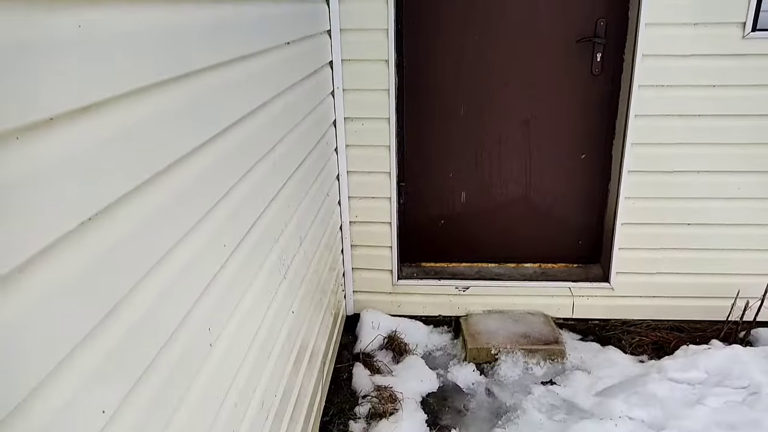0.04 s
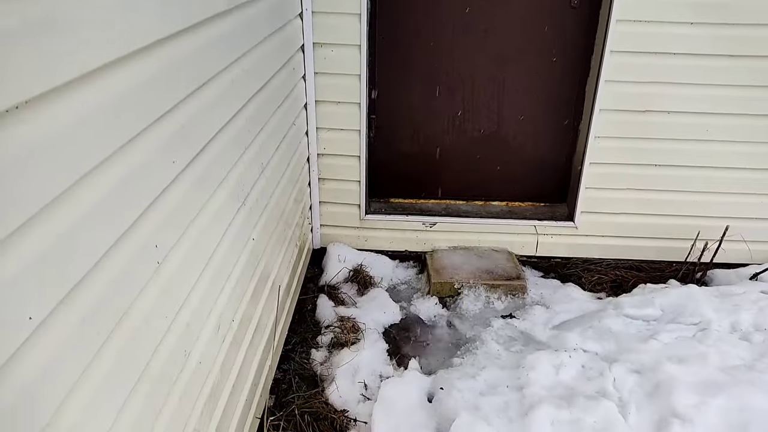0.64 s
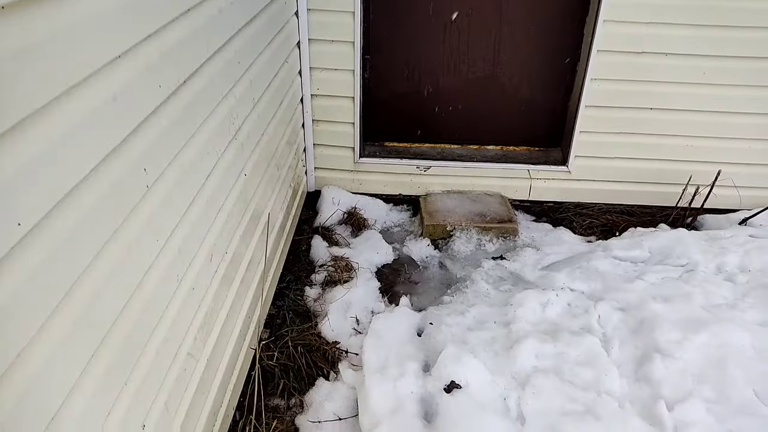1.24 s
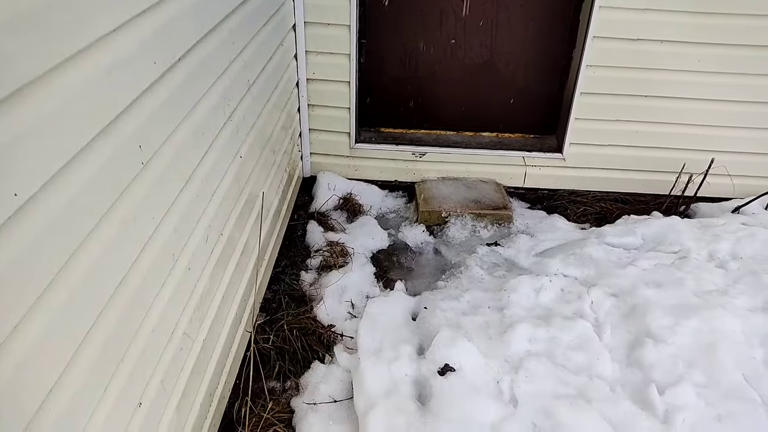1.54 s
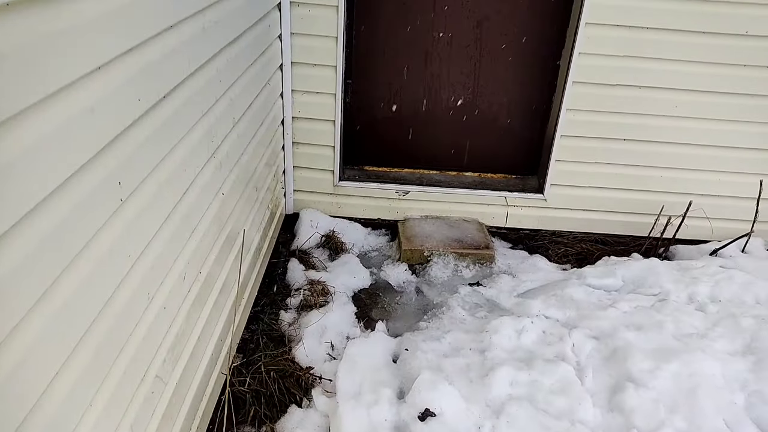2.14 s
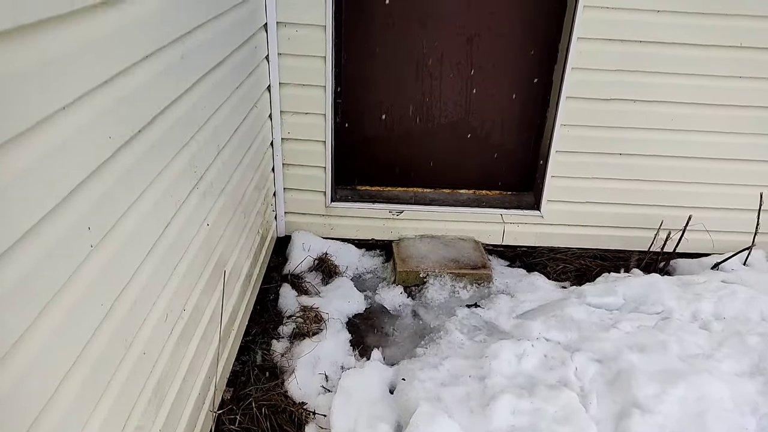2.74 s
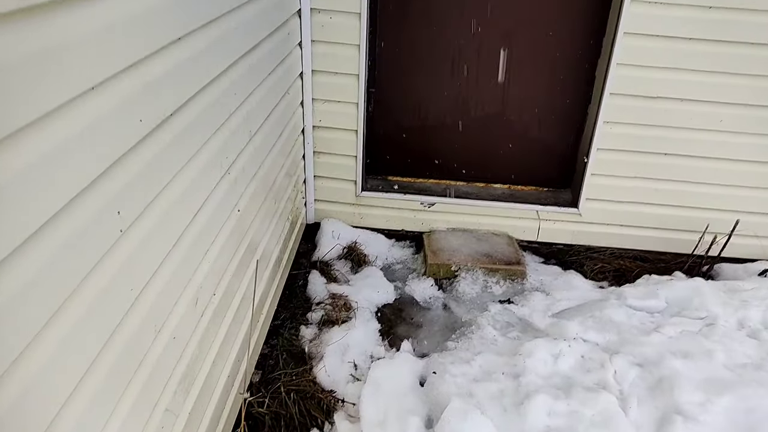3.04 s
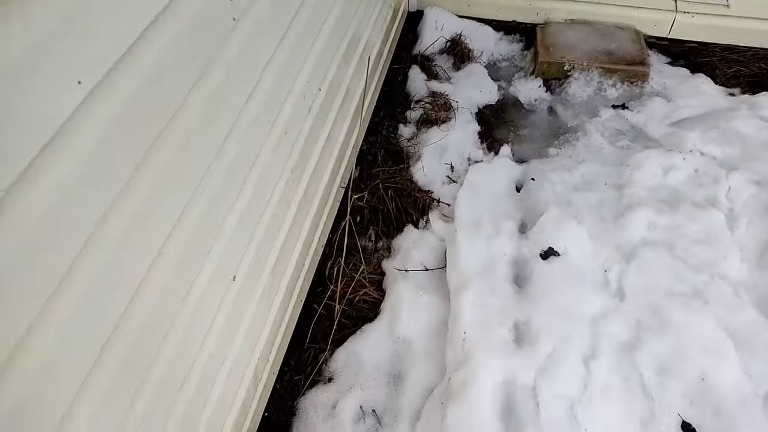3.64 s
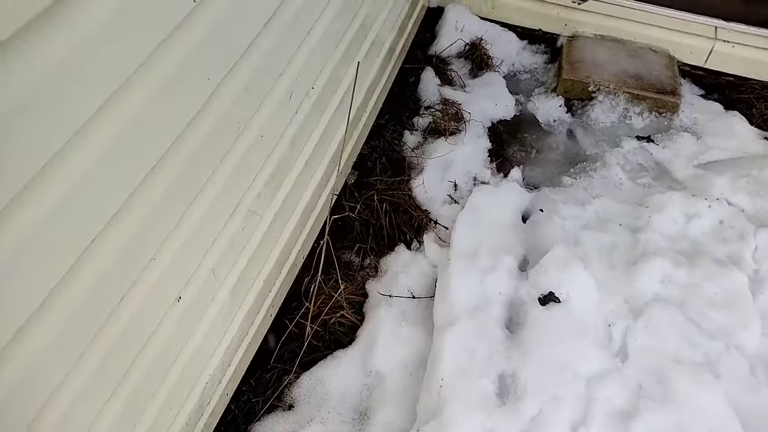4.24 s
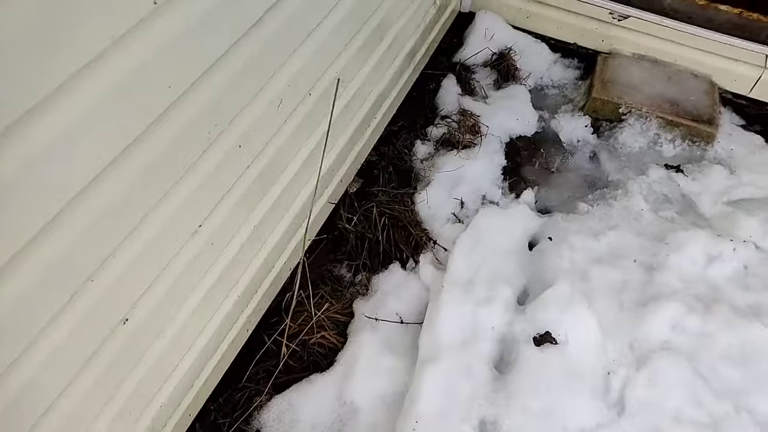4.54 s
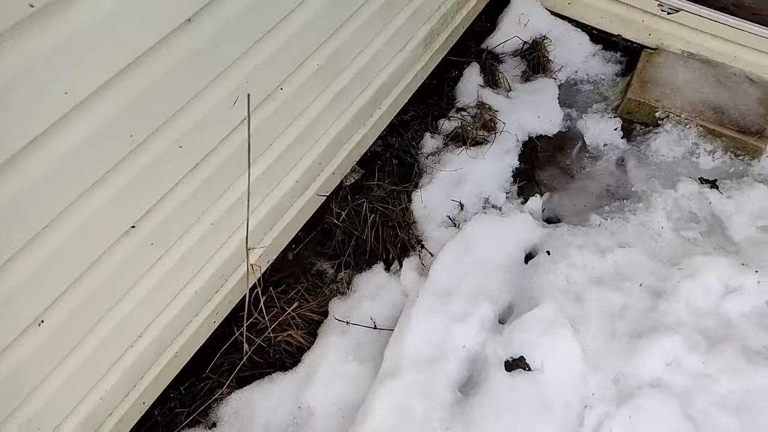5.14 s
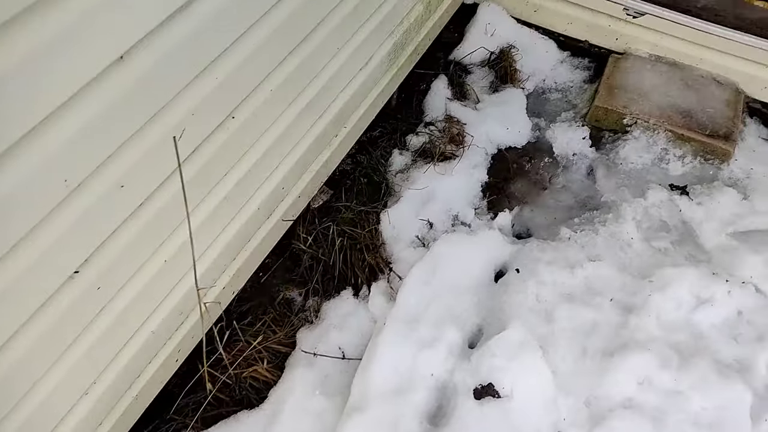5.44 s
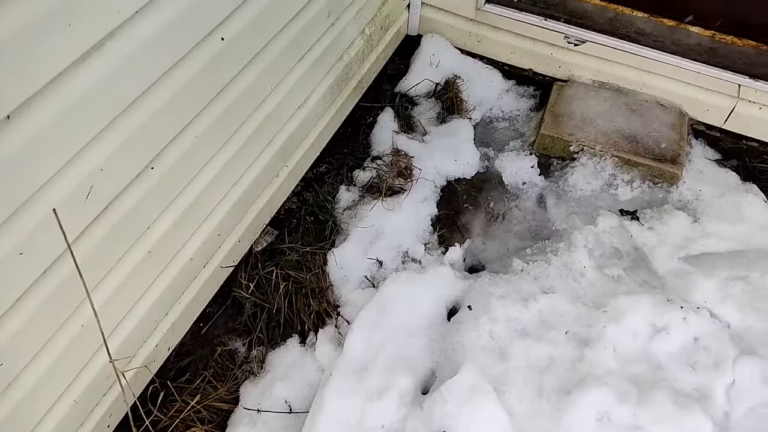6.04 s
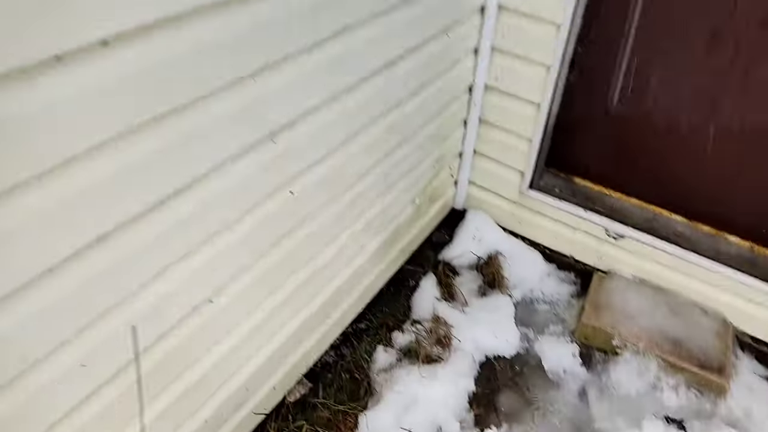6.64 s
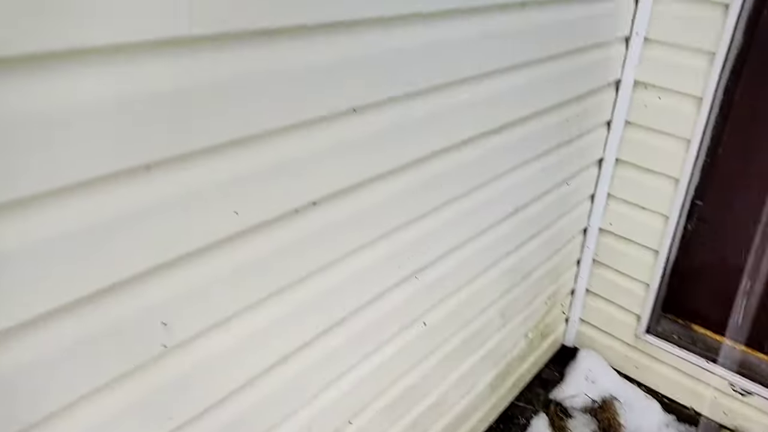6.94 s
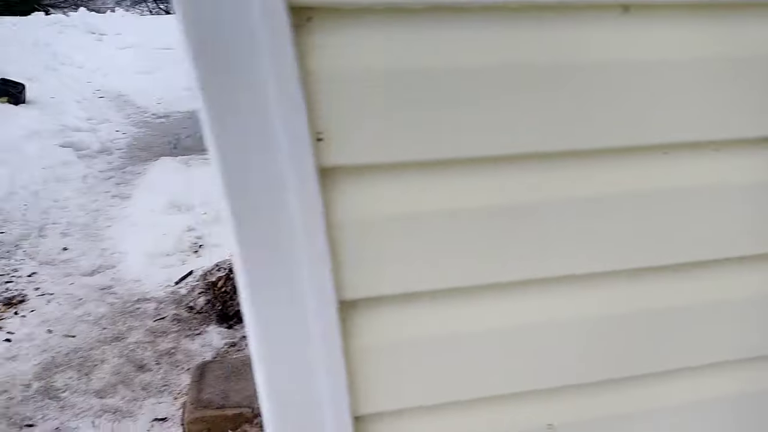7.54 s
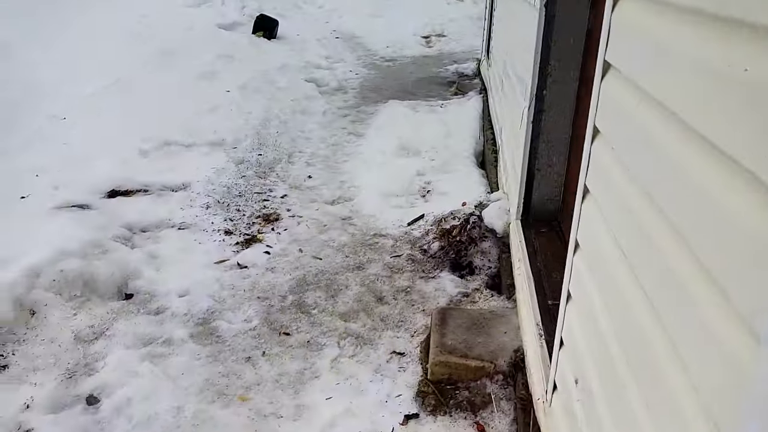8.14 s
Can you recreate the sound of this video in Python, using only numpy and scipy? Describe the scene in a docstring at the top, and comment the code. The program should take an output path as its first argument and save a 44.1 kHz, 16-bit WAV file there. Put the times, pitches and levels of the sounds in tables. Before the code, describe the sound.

Outdoors in the corner of a house, meltwater drips from the eaves close to the microphone, splatting on slush, ticking on ice and plinking in puddles in an irregular patter. Light wind rumbles on the microphone, mostly at the start. Midway, someone shifts through wet snow with soft crunches, and a few lighter steps follow near the end. The dripping never stops, over a faint fizz of seeping water.

```python
"""From the start, meltwater drips from the eaves in the corner of a house: each impact splats on slush,
ticks on ice or traps a ringing bubble in a puddle. Light wind buffets the microphone, most in the first
second. From 3 s to about 5.5 s someone shifts through wet snow, crushing its grains underfoot; a few
lighter steps follow near 7 s and 7.7 s, and the dripping lasts to the end. Throughout, slush seeps,
the two walls reflect the drips briefly, and each microphone port resonates at its own treble pitch."""
import sys
import numpy as np
from scipy import signal
from scipy.fft import rfft, irfft, next_fast_len
from scipy.io import wavfile
from scipy.ndimage import uniform_filter1d, map_coordinates

SR = 44100
rng = np.random.default_rng(int(sys.argv[2]) if len(sys.argv) > 2 else 0)


def put_to_file(sound):
    """Save the sound as 16-bit audio at rate SR, in the file named by the first command-line argument."""
    columns = np.atleast_2d(sound).T  # one column per channel
    safe = np.clip(columns, -1, 1)
    whole_steps = np.round(safe * 32767)
    wavfile.write(sys.argv[1], SR, whole_steps.astype(np.int16))


N = 369232

# Levels in all tables are relative; balance is left minus right.
# Loudest nearby drops: t/s, level/dB, slap/dB, balance/dB and, for heavy drops, thud/dB
NEAR_DROPS = [(.1311, -15, -22, 0), (.275, -15.5, -16, -7), (.393, -14, -21, -3), (.421, -22.5, -1.5, 1),
              (.6103, -6, -24, 1), (.762, -20, -4, 2, -14), (.806, -15, -30, 3.5, -16),
              (.856, -25, -2.5, 2), (.8849, -9, -10.5, 1, -23), (.927, -13, -11.5, 2), (.964, -20, 0, 1),
              (1.038, -9.5, -30, 2), (1.074, -17, -8, 0), (1.2062, -8, -10, .5, -22.5),
              (1.377, -12.5, -30, -3), (1.4, -13.5, -6, 2), (1.4198, -10, -32, 5), (1.448, -17, -8.5, -1),
              (1.492, -15.5, -23, 2.5, -14.5), (1.6106, -17.5, -20, 5), (1.699, -16, -9.5, 3),
              (1.7644, -19, -25, 1), (1.8055, -16.5, -13.5, 3), (2.0206, -3.5, -7, 2.5, -18.5),
              (2.117, -13.5, -25, -5), (2.141, -17, -14, 4), (2.1603, -13.5, -22, -5),
              (2.229, -14, -8, 1.5), (2.322, -10, -11.5, 5, -26), (2.489, -12, -8, -.5, -4),
              (2.5111, -13, -9, 0, -17), (2.7152, -12, -11, 0), (2.933, -14, -22, 6), (3.1474, -5, -15, 0),
              (3.3555, -14, -9, 5.5), (3.481, -11.5, -35, -4), (3.713, -18, -22, 6),
              (3.85, -10.5, -12, -3.5, -20), (3.9675, -15, -9, -1, -21), (4.0062, -3, -26, -6.5),
              (4.5263, -14, -24, -6, 0), (4.69, -14, -6.5, 3), (4.703, -12.5, -12.5, 5),
              (4.801, -10, -9, -3.5), (4.808, -3.5, -22, 6), (4.8787, -13, -9.5, 2), (4.935, -3, -25, 1),
              (5.0118, -14.5, -7, -1), (5.0495, -10, -14, -4), (5.1097, -13, -10, -2, -11.5),
              (5.1838, -7, -11, 0), (5.3765, -18, -10, 0, -3), (5.726, -16, -22, -1),
              (5.902, -8, -41, -2, -12.5), (6.1448, -13, -10, 4), (6.191, -22, -1, 2),
              (6.3941, -10.5, -16, -2), (6.6077, -10, -35, -7, -18), (6.64, -14, -15, 0, -15),
              (6.664, -15, -30, -3), (6.778, -11, -18, -1), (6.8251, -17.5, 2.5, -2),
              (6.8744, -6.5, -8.5, 3, -18), (6.923, -19, 0, 5), (7.017, -16.5, -32, -12),
              (7.2147, -14, -36, -7, -15), (7.348, -12.5, -29, -10, -20), (7.4136, -13.5, -24, -1, -19),
              (7.4335, -7.5, -7, .5, -23), (7.54, -9, -30, -4), (7.6209, -12.5, -26, -2.5, -8.5),
              (7.667, -8, -21, -3), (7.923, -10.5, -41, 2.5), (8.0294, -13, -20, -1), (8.08, -14, -17, -2),
              (8.153, -14.5, -30, -5), (8.2703, -15.5, -20, -8)]
# Droplets on hard ice: t/s, level/dB, balance/dB
ICE_TICKS = [(.571, -15, 2), (.695, -13, 1), (1.1064, -14, -2), (2.1824, -9, -3), (2.2, -13, -4),
             (2.4433, -12, 8), (2.8828, -14, 3), (2.9438, -12, -4), (3.5663, -10, 7), (4.9082, -12, -12),
             (5.0666, -8, -1), (5.674, -14, 1), (6.053, -13, 0), (6.1025, -15, 2), (6.4268, -13, -15),
             (7.2383, -11, -3), (7.491, -13.5, -11), (7.564, -12, -6.5), (7.6393, -6, -3),
             (7.9703, -15, -11)]
# Drops sinking into soft slush: t/s, level/dB, resonance of the hollow f/Hz
SLUSH_SPLASHES = [(.211, -35, 7000), (.316, -30, 4500), (.48, -33, 5500), (.53, -30, 4000),
                  (1.007, -32, 6000), (1.284, -36, 3000), (1.66, -30, 3600), (1.902, -27, 5600),
                  (1.945, -30, 6600), (2.55, -29, 3800), (2.603, -28, 6000), (2.648, -30, 3400),
                  (2.765, -32, 2700), (2.852, -31, 2500), (2.912, -29, 7000), (3.029, -32, 7000),
                  (3.649, -33, 2900), (3.886, -31, 3400), (4.838, -27, 6500), (5.568, -28, 2800),
                  (5.783, -29, 2500), (5.848, -31, 5000), (5.936, -24, 6100), (6.273, -26, 3600),
                  (6.31, -28, 6600), (6.503, -24, 4000), (7.074, -26, 2500), (8.179, -30, 5600),
                  (8.239, -32, 3000)]
# Bubbles trapped in puddles: t/s, level/dB, f/Hz
PUDDLE_BUBBLES = [(0.05, -28.5, 1360), (.764, -25, 5300), (.887, -23, 3900), (.965, -25, 4000),
                  (1.159, -37, 1680), (1.206, -28, 2160), (1.235, -31, 2210), (1.366, -27, 1330),
                  (1.395, -30, 1430), (1.452, -22, 3430), (1.635, -34.5, 1840), (1.639, -28, 3940),
                  (1.846, -30, 2200), (1.864, -13.5, 8850), (1.903, -35, 2020), (1.936, -32.5, 1590),
                  (2.022, -9, 3830), (2.308, -17.5, 7460), (2.86, -32, 2290), (2.972, -23, 1835),
                  (3.896, -35, 1630), (5.377, -21, 2010), (5.475, -26.5, 774), (5.499, -23.5, 880),
                  (5.784, -33, 1470), (5.835, -34, 573), (5.883, -33, 2090), (5.923, -26, 964),
                  (6.386, -26, 890), (6.442, -26, 2700), (6.573, -21, 1420), (6.773, -28, 1720),
                  (6.987, -31, 1780), (7.051, -30.5, 1720), (7.863, -16, 1760), (7.899, -27, 1890),
                  (8.107, -39, 1940)]
# Rising runs of bubbles: t/s, level/dB, first f/Hz, last f/Hz, duration/s
GURGLE_RUNS = [(0.512, -41, 670, 1610, 0.026), (1.578, -41, 814, 1600, 0.046),
               (5.172, -39, 440, 1110, 0.082), (5.903, -31, 890, 1500, 0.044)]
# Weight shifts onto a boot: t/s, rise/s, hold/s, T60/s, crunch/dB, crackle/dB, thud/dB
FOOTFALLS = [(3.067, 0.01, 0.03, .15, -34, -33.5, -24.5), (3.119, 0.023, 0.037, 0.19, -28, -27.5, -22),
             (3.274, 0.005, 0.006, 0.12, -23.5, -22.5, -17), (3.297, 0.0037, 0.0019, 0.1, -29, -21, -25),
             (3.408, 0.059, 0.0061, 0.072, -36, -36, -40), (3.785, .025, .02, .09, -41, -43, -41),
             (3.986, 0.0024, .002, 0.046, -31, -47, -28), (4.001, 0.0053, 0.005, 0.12, -28, -27, -26),
             (4.015, 0.0092, 0.073, 0.41, -35.5, -29, -50), (4.151, 0.066, 0.021, 0.37, -24, -22, -44),
             (4.261, 0.021, 0.052, 0.14, -26.5, -26, -30), (4.37, 0.07, 0.029, 0.14, -24, -23, -30.5),
             (4.501, 0.018, 0.058, 0.17, -34.5, -30.5, -34),
             (4.926, 0.013, 0.0049, 0.062, -38.5, -17.5, -43), (5.16, 0.04, 0.02, 0.1, -55, -30, -44),
             (5.221, 0.03, 0.054, 0.4, -35, -18, -47), (5.458, 0.018, 0.15, 0.46, -45, -34.5, -48),
             (6.81, 0.019, 0.013, 0.06, -37.5, -31, -37), (6.867, 0.0069, 0.027, 0.6, -37.5, -30.5, -47),
             (7.162, 0.0051, 0.0067, 0.094, -56, -48, -32.5),
             (7.714, 0.012, 0.014, 0.061, -31.5, -25.5, -28.5), (7.746, 0.02, 0.07, 0.18, -43, -33, -55)]
# Spectra of snow packing, coarse crunch and fine crackle: f/Hz, level/dB
PACKING_SPECTRUM = [(60, -29), (160, -4.5), (360, 1), (560, 2), (850, -6), (1300, -7.5), (1900, -2),
                    (2800, -19), (6000, -11)]
CRUNCH_SPECTRUM = [(100, 2), (250, -14.5), (450, -14), (750, -3.5), (1200, 1), (1550, 0), (1900, 3),
                   (2600, -6), (3500, -4), (4500, -26), (9000, -48)]
CRACKLE_SPECTRUM = [(800, -7.5), (2800, -1), (4000, -1), (5200, -1.5), (7000, 2.5), (10000, 1.5),
                    (14000, 0)]
# Left-right coherence underfoot and of the background: f/Hz, coherence/1
BOOT_COHERENCE = [(60, .2), (290, 1), (700, .65), (1400, 0.31), (3000, 0.086), (6500, 0.017)]
FIELD_COHERENCE = [(60, 0.13), (250, 0.67), (500, 0.3), (1000, 0.05), (2000, 0.07), (4000, 0.028),
                   (10000, 0.017)]
# Breeze between gusts: t/s, level/dB
BREEZE_LEVELS = [(0, -27.5), (1.9, -39), (2.8, -50), (4.0, -43.5), (4.8, -48), (5.6, -51.5), (6.4, -64),
                 (7.4, -45), (8.37, -41.5)]
# Gusts on the microphone: t/s, duration/s, level/dB
WIND_GUSTS = [(0, 0.25, -25), (0.325, 0.064, -23), (0.475, 0.071, -22.5), (0.7, 0.17, -28.5),
              (1.432, 0.048, -32), (2.371, 0.11, -32.5), (3.369, 0.36, -34.5), (4.116, 0.21, -29),
              (4.358, 0.17, -30), (5.005, 0.17, -36), (5.49, 0.064, -37), (6.61, 0.21, -42.5),
              (6.823, 0.077, -27), (6.925, 0.38, -32.5), (8.112, 0.14, -30.5)]
# Sudden eddies at the ports: t/s, level/dB, half-width/s
EDDY_THUMPS = [(.009, -23, .005), (.074, -26, .005), (.12, -26, .009), (.175, -20, .005), (.202, -18, .006),
               (.24, -23, .008), (.36, -25, .014), (.538, -16, .0075), (6.898, -29, .01)]
# Spectra of the wind's deep rumble and higher flutter: f/Hz, level/dB
RUMBLE_SPECTRUM = [(10, 2), (25, 3.5), (65, 0.5), (110, -6), (180, -21), (300, -34), (800, -44),
                   (3000, -100)]
FLUTTER_SPECTRUM = [(40, -18), (110, 7.5), (210, 1), (300, -11), (450, -21.5), (1000, -59), (3000, -84)]
# Background of melting: t/s, spray level/dB, slush level/dB
SEEP_LEVELS = [(0, -39, -54), (.72, -33.5, -47.5), (2.9, -32.5, -42.5), (4.36, -29.5, -39.5),
               (4.7, -34.5, -47), (5.5, -30.5, -38.5), (6.04, -31.5, -46), (6.76, -27, -39),
               (7.0, -28.5, -39), (7.15, -28.5, -39.5), (7.55, -39.5, -43.5), (8.37, -35, -42)]
# Spectra of distant spray and seeping slush: f/Hz, level/dB
SPRAY_SPECTRUM = [(500, -12), (1500, 8), (2900, 6.5), (4000, 11.5), (5000, 11.5), (8000, 11), (14000, 14)]
SLUSH_SPECTRUM = [(30, 23), (100, 4.5), (250, 1.5), (500, 2), (1000, -5), (1900, -2.5), (3000, -4),
                  (8000, -62)]
# Decay of the wall reflections: f/Hz, T60/s
WALL_DECAY = [(200, 0.019), (2000, 0.13), (10000, 0.047)]
# Resonances of the left and right port: f/Hz, bandwidth/Hz, gain/dB
PORT_RESONANCES = [(8640, 937, 17), (11350, 2070, 14.5)]


def drops(tick_db=-13, slap_db=-7.5, smack_db=-16, thud_db=-6, ring_db=-7.5, spray_db=-19.5):
    """Impact excitation: a drop cracks, bursts and sprays, sounding a hollow in slush and tiny bubbles."""
    crack_t60, burst_t60, spray_t60 = .00028, .026, .28  # s
    out, t = np.zeros((2, N)), np.arange(SR // 7) / SR
    for s, db, slap, pan_db, *heavy in NEAR_DROPS:
        thud = heavy[0] if heavy else -31
        noise = rng.standard_normal((6, len(t)))
        bright, dull, common = noise[:2], noise[2:4], noise[4]
        crack = amp(6 - 60 * t / crack_t60)
        burst = amp(-60 * t / (burst_t60 * rng.lognormal(0, .2))) * (1 - np.exp(-t / .0003))
        droplets = amp(3.5 * unit(uniform_filter1d(noise[5], size=45)))  # the drop breaks up unevenly
        impact = crack + burst * unit(droplets)
        splash = impact + amp(spray_db - 60 * t / spray_t60) * droplets
        tick = amp(tick_db) * band(splash * (bright + .047 * common), 6160, 12540)
        hollow_hz = 4290 * rng.lognormal(0, .11)
        hollow = band(splash * (.8 * dull + .5 * common), .82 * hollow_hz, 1.22 * hollow_hz)
        smack = band(splash * (bright + common), 2200, 6500)
        wet = amp(slap_db + slap) * hollow + amp(smack_db + slap) * smack
        low = amp(thud_db + thud) * band(impact * common, 180, 2460)
        gain = amp(db) * balance(pan_db)
        add(out, s, gain * (tick + wet + low))
        delays = rng.exponential(.003, size=3)
        bubble_hz = np.array([4000, 5600, 9000]) * rng.lognormal(0, .12, size=3)
        for delay, hz in zip(delays, bubble_hz):
            share_db = np.interp(hz, [5000, 9000], [slap, -10])  # larger bubbles come with a wetter slap
            add(out, s + delay, gain * amp(ring_db + share_db) * ping(hz, cycles=70, glide=.04))
    return out


def ticks(level_db=-7.5, crack_t60=.012, tail_db=-15, tail_t60=.08):
    """Impact on a rigid surface: a droplet on ice gives one bright crack and a trace of spray."""
    out, t = np.zeros((2, N)), np.arange(SR // 15) / SR
    envelope = amp(-60 * t / crack_t60) + amp(tail_db - 60 * t / tail_t60)
    for s, db, pan_db in ICE_TICKS:
        tick = band(rng.standard_normal((2, len(t))) * envelope, 6000, 14000)
        tick /= np.abs(tick).max(axis=1, keepdims=True)
        add(out, s, amp(db + level_db) * balance(pan_db) * tick)
    return out


def splashes(level_db=-6.5, hollow_db=-8, rise_s=.0015, t60=.085, uneven_db=3.5):
    """Cavity resonance: a drop sinks into slush, scatters spray and leaves a ringing hollow."""
    out, t = np.zeros((2, N)), np.arange(SR // 7) / SR
    for s, db, hz in SLUSH_SPLASHES:
        noise = rng.standard_normal((3, len(t)))
        flicker_db = uneven_db * unit(uniform_filter1d(noise[2], size=90))
        spray = noise[:2] * (1 - np.exp(-t / rise_s)) * amp(flicker_db - 60 * t / t60)
        hollow = amp(hollow_db) * band(spray, .85 * hz, 1.18 * hz)
        add(out, s, amp(db + level_db) * (band(spray, 6500, 14000) + hollow))
        add(out, s + rise_s, amp(db + level_db) * ping(hz, cycles=130, glide=.06))
    return out


def bubbles(ring_db=2, splash_db=-8, splash_t60=.045, ring_t60_at_1khz=.031):
    """Bubble resonance: air trapped by a splash in a puddle rings, the low bubbles a little longer."""
    out, t = np.zeros((2, N)), np.arange(SR // 25) / SR
    for s, db, hz in PUDDLE_BUBBLES:
        splash = band(rng.standard_normal(len(t)) * amp(-60 * t / splash_t60), .65 * hz, 2 * hz)
        ring = ping(hz, cycles=ring_t60_at_1khz * np.sqrt(1000 * hz), glide=.07)
        add(out, s, amp(db) * (amp(ring_db) * ring + amp(splash_db) * splash))
    return out


def gurgles(count=8):
    """Pitch varies inversely with radius: water filling a hollow sheds ever smaller bubbles."""
    out = np.zeros((2, N))
    for s, db, start_hz, end_hz, length in GURGLE_RUNS:
        for progress in np.linspace(0, 1, count):
            onset = s + progress * length + rng.normal(0, .002)
            hz = start_hz * (end_hz / start_hz) ** progress
            add(out, onset, amp(db) * ping(hz, cycles=22, glide=.1))
    return out


def steps(squelch_db=-6):
    """Granular fracture: wet ice crunches and crackles under a boot, and the snow thuds as it packs."""
    power = np.zeros((3, N))
    for start, rise, hold, t60, *levels_db in FOOTFALLS:
        power += (amp(levels_db)[:, None] * swell(start, rise, hold, t60)) ** 2
    crunch, crackle, thud = np.sqrt(power)

    def snow(spectrum, depth_db, **texture):
        return hollows(stereo(grains(**texture), spectrum, BOOT_COHERENCE), depth_db)

    packing = snow(PACKING_SPECTRUM, depth_db=2.5, per_s=400, spread_db=4, t60=.014, hiss=.5)
    coarse = snow(CRUNCH_SPECTRUM, depth_db=3.5, per_s=380, spread_db=3, t60=.008, hiss=.35)
    fine = snow(CRACKLE_SPECTRUM, depth_db=2.5, per_s=2400, spread_db=4, t60=.004, hiss=.7)
    return thud * packing + crunch * (coarse + amp(squelch_db) * squelch()) + crackle * fine


def squelch(middle_hz=1550, count=900, spread_db=4):
    """Compression drives air out of soaked snow as short rising bubble tones; rms 1."""
    out = np.zeros((2, N))
    onsets = rng.uniform(0, N / SR, count)
    for s, (loud, pitch) in zip(onsets, rng.standard_normal((count, 2)).clip(-2, 1.6)):
        add(out, s, amp(spread_db * loud) * ping(middle_hz * np.exp(.45 * pitch), cycles=34, glide=.12))
    return unit(out)


def wind(flutter_db=-9, steepness=2.07, reference_db=-25, lumps_db=4.5, rise_s=.023, t60=.27):
    """Turbulent pressure: eddies hit each port separately, and stronger gusts reach higher in pitch."""
    breeze_db, = curves(BREEZE_LEVELS)
    gust_power = sum((amp(db) * swell(s, rise_s, length - rise_s, t60)) ** 2
                     for s, length, db in WIND_GUSTS)
    buffet_db = 10 * np.log10(amp(breeze_db) ** 2 + gust_power)
    lumps = amp(lumps_db * np.array([wobble(28), wobble(28)]))

    def eddies(spectrum):
        return unit(lumps * filtered(rng.standard_normal((2, N)), lambda hz: amp(along(spectrum, hz))))

    t = np.arange(N) / SR
    thumps = sum(amp(db) * np.exp(-np.minimum(((t - s) / width) ** 2, 20)) for s, db, width in EDDY_THUMPS)
    rumble = amp(buffet_db) * eddies(RUMBLE_SPECTRUM)
    flutter_gain = amp(reference_db + flutter_db + steepness * (buffet_db - reference_db))
    flutter = (thumps + flutter_gain) * eddies(FLUTTER_SPECTRUM)
    return (rumble + flutter) * amp([[3.5], [.5]])  # stronger on the left


def trickle(level_db=-40.5, middle_hz=2200, spread_db=3, count=100):
    """Random bubble resonances: seeping water rings faintly in wet snow, the higher bubbles louder."""
    out = np.zeros((2, N))
    onsets = rng.uniform(0, N / SR, count)
    for s, (loud, pitch) in zip(onsets, rng.standard_normal((count, 2)).clip(-2, 1.5)):
        ring = ping(middle_hz * np.exp(.35 * pitch), cycles=36, glide=.11)
        add(out, s, amp(level_db + spread_db * loud + 2 * pitch) * ring)
    return out


def seep(fizz_db=-10):
    """Incoherent summation: tiny events merge into a fizz of distant spray and a seep of melting slush."""
    spray_db, slush_db = curves(SEEP_LEVELS)
    spray = stereo(grains(per_s=120, spread_db=5, t60=.02, hiss=.7), SPRAY_SPECTRUM)
    fizz = hollows(spray, depth_db=2.5)
    slush = stereo(grains(per_s=54, spread_db=7.5, t60=.15, hiss=.51), SLUSH_SPECTRUM)
    return amp(spray_db + fizz_db) * fizz + amp(slush_db) * slush


def walls(x, delay_s=.0028):
    """Diffuse reflection: the siding scatters a short, delayed tail back to each port."""
    hz, t, spectra = signal.stft(rng.standard_normal((2, SR // 4)), SR, nperseg=256)
    tail = signal.istft(spectra * amp(-60 * t / along(WALL_DECAY, hz)[:, None]), SR, nperseg=256)[1]
    tail = np.pad(tail / np.linalg.norm(tail[0]), ((0, 0), (round(delay_s * SR), 0)))
    return signal.fftconvolve(x, tail, axes=1)[:, :N]


def ping(hz, cycles, glide):
    """Damped oscillation: a bubble falls 60 dB in `cycles` periods, its pitch rising by the part `glide`."""
    turns = hz * np.arange(SR // 25) / SR
    age = turns / cycles
    phase = 2 * np.pi * turns * (1 + glide * np.minimum(age, 1))
    port_phase = rng.normal(0, min(hz / 2500, 3), (2, 1))
    return np.sin(phase + port_phase) * amp(-60 * age) * (1 - np.exp(-turns * 2))


def grains(per_s, spread_db, t60, hiss):
    """Shot noise: two channels of tiny bursts of random time and size, on a bed of hiss."""
    sizes = (rng.random(N) < per_s / SR) * amp(spread_db * np.minimum(rng.standard_normal(N), 2))
    decay = amp(-60 * np.arange(SR // 10) / SR / t60)
    power = signal.fftconvolve(sizes ** 2, decay ** 2)[:N].clip(0)
    return np.sqrt(power / power.mean() + hiss ** 2) * rng.standard_normal((2, N))


def hollows(x, depth_db):
    """Transient resonance: pockets in the snow colour the sound as they open and collapse."""
    spectra = signal.stft(x, nperseg=512)[2]
    field = uniform_filter1d(rng.standard_normal(spectra.shape[1:]), size=3, axis=0)  # over frequency
    field = uniform_filter1d(field, size=6, axis=1)  # over time
    return unit(signal.istft(spectra * amp(depth_db * unit(field)), nperseg=512)[1][:, :N])


def stereo(pair, spectrum, coherence=FIELD_COHERENCE):
    """Partial coherence: two unrelated signals are coloured and blended as mid and side; rms 1."""
    def response(hz):
        angle = np.arccos(np.clip(along(coherence, hz), -1, 1)) / 2
        return amp(along(spectrum, hz)) * np.array([np.cos(angle), np.sin(angle)])

    mid, side = filtered(pair, response)
    return unit(np.array([mid + side, mid - side]))


def swell(start, rise, hold, t60):
    """Envelope: a linear rise to 1, a hold and an exponential decay."""
    age = np.arange(N) / SR - start
    return np.clip(age / rise, 0, 1) * amp(-60 * np.clip((age - rise - hold) / t60, 0, 2))


def wobble(per_s):
    """Spline interpolation through random knots."""
    knots = rng.standard_normal(int(N * per_s / SR) + 4)
    return map_coordinates(knots, [np.arange(N) * per_s / SR])


def band(x, lo_hz, hi_hz):
    """Causal band-pass that keeps the rms of white noise."""
    sos = signal.butter(2, [lo_hz, min(hi_hz, .48 * SR)], 'band', fs=SR, output='sos')
    return signal.sosfilt(sos, x) * np.sqrt(SR / 2 / (hi_hz - lo_hz))


def filtered(x, response):
    """Linear filtering: the spectrum of x times a complex frequency response."""
    size = next_fast_len(N + SR // 4)
    return irfft(rfft(x, size) * response(np.fft.rfftfreq(size, 1 / SR)), size)[..., :N]


def along(points, hz):
    """Interpolation of (f/Hz, value) points on a logarithmic axis."""
    f, values = np.transpose(points)
    return np.interp(np.log(hz + 1), np.log(f + 1), values)


def curves(rows):
    """Linear interpolation: one value per sample for each column after the time."""
    times, *columns = np.transpose(rows)
    return [np.interp(np.arange(N) / SR, times, column) for column in columns]


def add(track, s, sound):
    """Superposition of a sound on a track at time s."""
    span = track[:, max(round(s * SR), 0):][:, :sound.shape[-1]]
    span += sound[..., :span.shape[-1]]


def balance(db):
    """Level difference as left and right gains."""
    return amp([[db / 2], [-db / 2]])


def amp(db):
    """Decibels to amplitude ratio."""
    return 10 ** (np.asarray(db) / 20)


def unit(x):
    """Normalisation to rms 1."""
    return x / np.sqrt(np.mean(x ** 2) + 1e-20)


def scene(wall_db=-9):
    """Superposition of the drips, their reflections, seeping slush, footsteps and wind."""
    drips = drops() + ticks() + bubbles() + gurgles() + trickle() + splashes()
    return drips + amp(wall_db) * walls(drips) + seep() + steps() + wind()


def record(dry, ceiling=.9, top_hz=14500):
    """Port resonance lifts each channel's treble; peaks then clip and the band ends steeply."""
    def ports(f):
        return np.array([1 + (amp(db) - 1) * 1j * f * width / (hz * hz - f * f + 1j * f * width)
                         for hz, width, db in PORT_RESONANCES])

    clipped = np.clip(filtered(dry, ports), -ceiling, ceiling)
    return filtered(clipped, lambda hz: hz < top_hz)


dry = scene()
out = record(dry)
put_to_file(out)
```